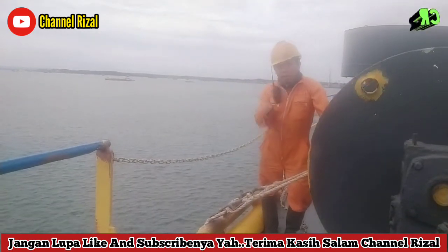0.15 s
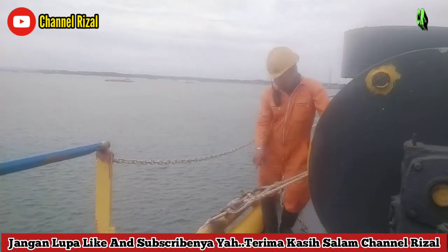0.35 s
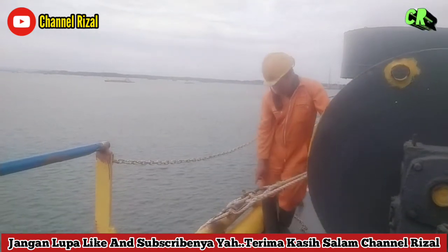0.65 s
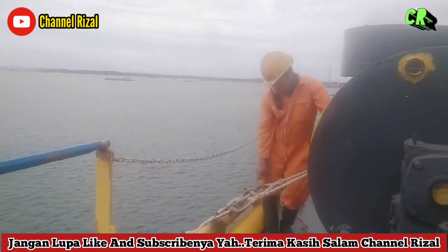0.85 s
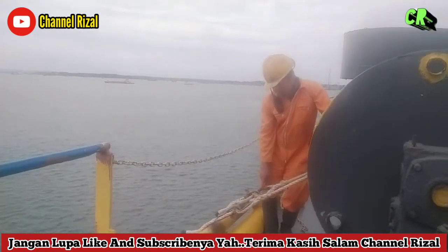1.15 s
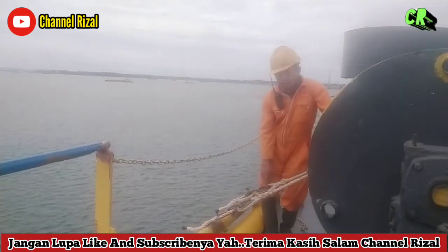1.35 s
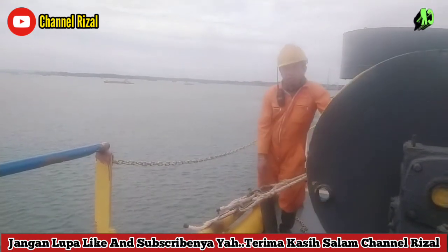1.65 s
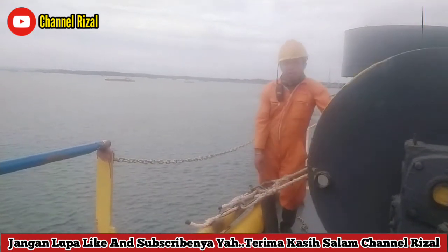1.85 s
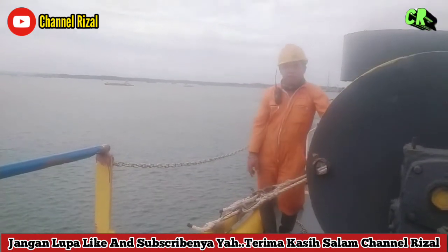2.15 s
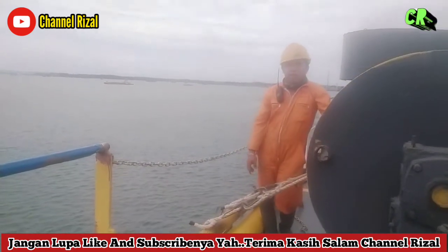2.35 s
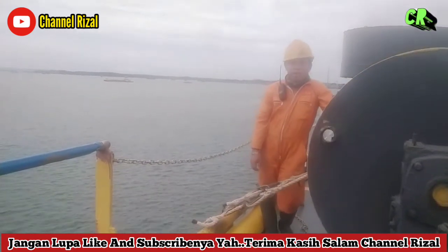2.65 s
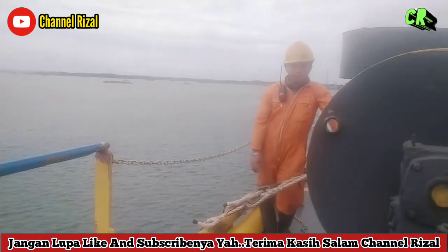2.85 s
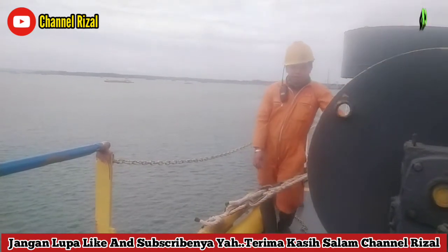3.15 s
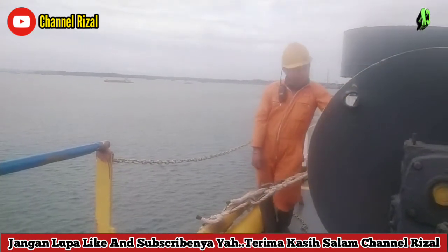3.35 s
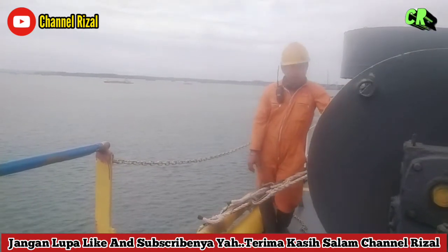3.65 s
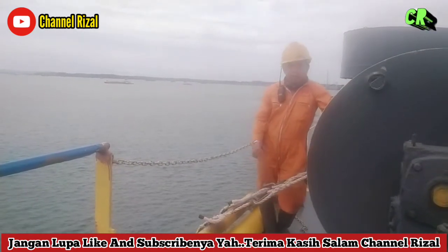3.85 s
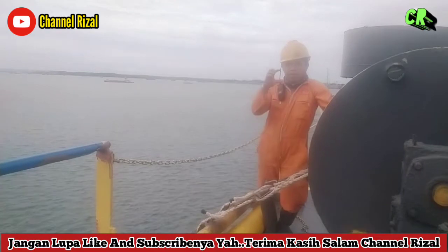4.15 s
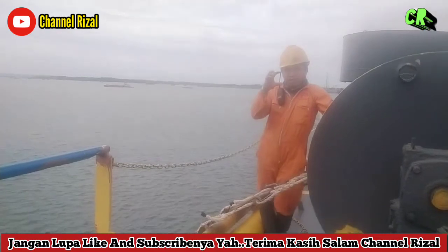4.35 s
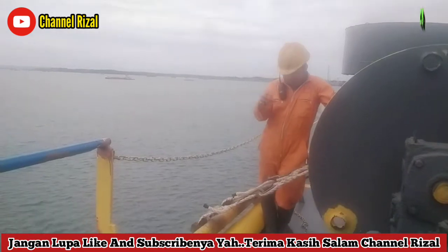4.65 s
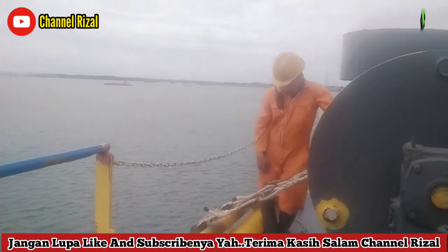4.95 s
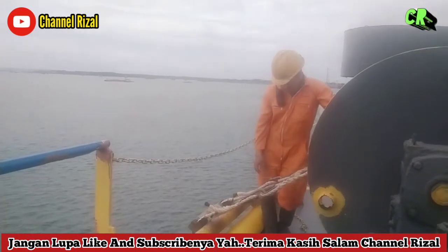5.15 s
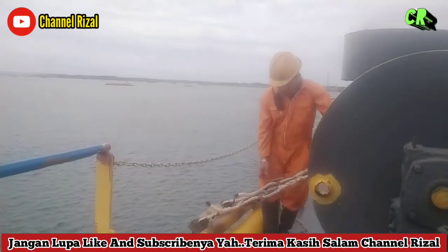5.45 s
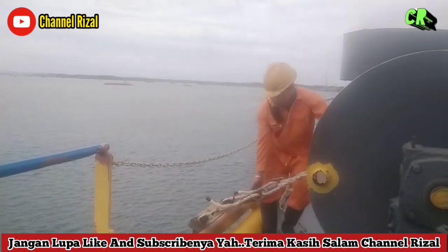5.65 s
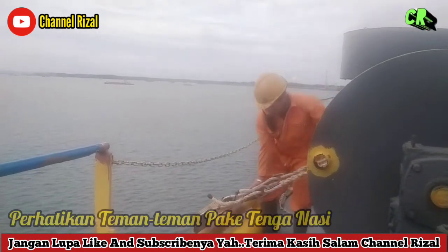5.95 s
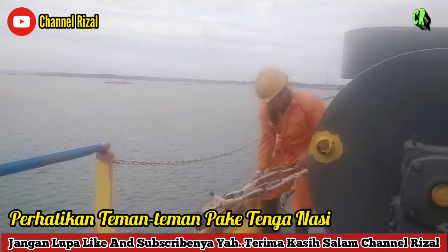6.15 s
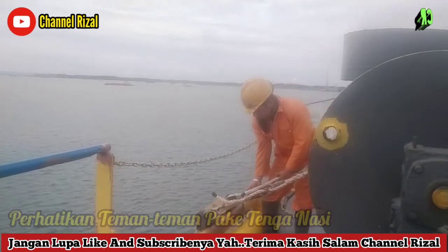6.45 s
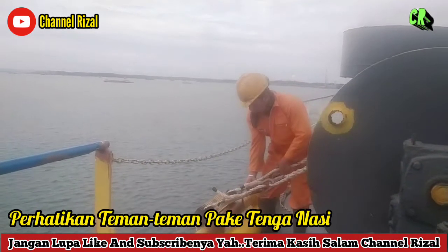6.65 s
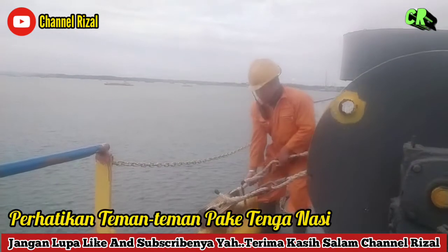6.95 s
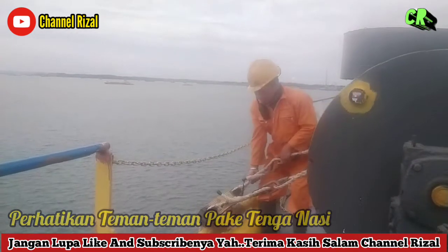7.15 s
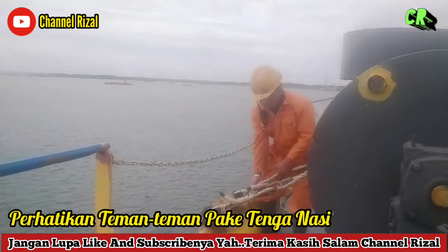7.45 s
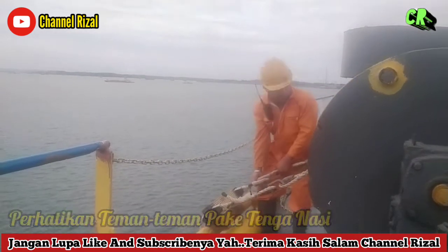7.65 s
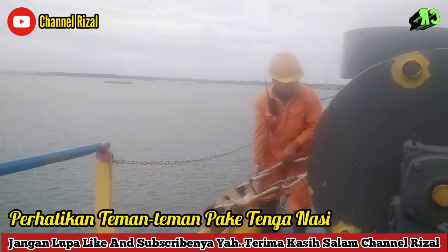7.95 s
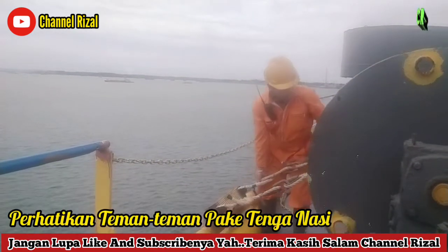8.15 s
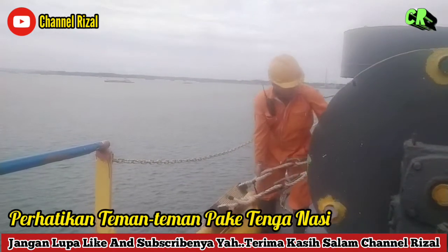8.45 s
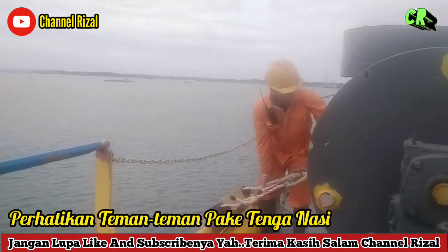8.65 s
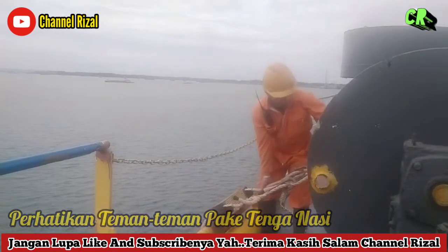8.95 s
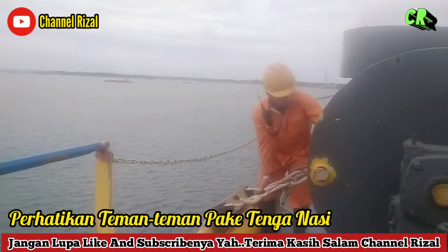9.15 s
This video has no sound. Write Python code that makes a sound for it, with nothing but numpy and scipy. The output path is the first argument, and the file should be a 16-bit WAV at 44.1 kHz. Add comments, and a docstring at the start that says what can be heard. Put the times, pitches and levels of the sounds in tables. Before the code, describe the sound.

A vane air motor turns a big reel beside the microphone. Its rough, reedy whine flutters slightly and changes colour as its pitch slides, covered by a dense, jet-like hiss of escaping air. After a steady start it labours and droops, recovers, droops deeper, then speeds up with small surges before easing. Quiet ship machinery hum underneath; close, centred, harsh sound with momentary small drops in loudness.

```python
"""On a ship's deck, close by, a vane air motor winds a heavy ladder onto its reel.
Each vane lets out a puff: the puffs make a whine whose harmonics swell and fade as they slide
through the housing's resonances. The motor sags under load, then runs free again.
Exhaust air hisses loudly as shaped noise, the gears sing as tones locked to the rotor,
and the ship rumbles below as low noise and two wavering hums."""
import sys
import numpy as np
from scipy import signal
from scipy.fft import rfft, irfft, next_fast_len
from scipy.io import wavfile

SR = 44100
rng = np.random.default_rng(int(sys.argv[2]) if len(sys.argv) > 2 else 0)


def wav_out(sig):
    """Save sig, one row per channel (or a flat mono array), as 16-bit PCM at SR to the path in sys.argv[1]."""
    wavfile.write(sys.argv[1], SR, np.round(np.clip(np.atleast_2d(sig).T, -1, 1) * 32767).astype(np.int16))


N = 410130

FREE_SPEED_HZ = 305  # vane puffs per second; reference for unevenness and hiss brightness


def from_db(db):
    """Level law: decibels to amplitude gain, 20 dB per factor of ten."""
    return 10 ** (np.asarray(db) / 20)


def rms_one(x):
    """Power normalisation: scale to rms 1."""
    return x / np.sqrt(np.mean(x ** 2) + 1e-20)


def in_time(rows):
    """Linear interpolation of (time, value) rows to every sample."""
    return np.interp(np.arange(N) / SR, *np.transpose(rows))


def response(modes, hz):
    """Power sum of steep-sided resonances; each width is taken at half the peak amplitude."""
    power = 0
    for centre, width, db in modes:
        detuning = 2 * (hz - centre) / width
        power = power + from_db(db) ** 2 / (1 + detuning ** 2) ** 2
    return np.sqrt(power)


def cancelling(hz):
    """Destructive interference: the gain falls to zero and changes sign at each notch."""
    # where the paths round the housing cancel: centre_hz, width_hz
    notches = [(908, 26), (1492, 45), (1606, 51), (2032, 25), (2406, 16), (3825, 180)]
    factors = [(hz - centre) / np.hypot(hz - centre, width / 2) for centre, width in notches]
    return np.prod(factors, axis=0)


def causal(gain):
    """Minimum phase: the Hilbert transform of log gain gives the phase of a causal resonator."""
    mirrored = np.log(np.abs(np.r_[gain, gain[-2:0:-1]]) + 1e-3)
    return np.exp(np.conj(signal.hilbert(mirrored)))[:len(gain)]


def noise(gain_at):
    """Spectral shaping: white noise weighted by a function of frequency, scaled to rms 1."""
    size = next_fast_len(N, real=True)
    white = rfft(rng.standard_normal(size))
    hz = np.arange(len(white)) * SR / size + 1e-3  # offset keeps log(hz) finite
    return rms_one(irfft(white * gain_at(hz), size)[:N])


def drift(rate_hz):
    """Low-pass random process: noise through two equal poles at rate_hz, scaled to rms 1."""
    step = 40  # samples between the slow values
    pole = np.exp(-2 * np.pi * rate_hz * step / SR)
    steps = rng.standard_normal(N // step + 2002)
    slow = signal.lfilter([1], [1, -2 * pole, pole * pole], steps)[2000:]  # drop the settling
    return np.interp(np.arange(N) / step, np.arange(len(slow)), rms_one(slow))


def motor_speed():
    """Load balance: drags pull the speed down exponentially until the ladder frees; surges lift it."""
    # speed at which the air supply drives the motor, before drags and surges: time_s, puffs_hz
    supply_speed = [(0.0, 305.1), (1.63, 304.0), (2.04, 301.1), (2.41, 308.4), (3.42, 302.5), (5.45, 306.2),
                    (6.59, 311.5), (6.78, 325.0), (7.12, 327.5), (7.48, 316.3), (8.14, 315.3), (9.3, 302.6)]
    # the ladder drags; the drop is what an endless drag would reach: start_s, end_s, drop_hz, recovery_s
    drags = [(3.425, 4.08, 45, .263), (4.3, 5.46, 68, .116)]
    # the load eases; half_length_s is from the peak to 1/e: peak_s, rise_hz, half_length_s
    surges = [(6.2, 10, .124), (7.107, 6, .063), (7.93, 14, .1), (8.516, 9, .1)]
    sag_s = .94  # time constant of the sinking
    t = np.arange(N) / SR
    sag, surge = 0, 0
    for start, end, drop, recovery in drags:
        sinking = 1 - np.exp(-np.maximum(t - start, 0) / sag_s)
        sag = sag + drop * sinking * np.clip(1 - (t - end) / recovery, 0, 1)
    for peak, rise, half_length in surges:
        surge = surge + rise * np.exp(-((t - peak) / half_length) ** 2)
    return in_time(supply_speed) - sag + surge


def rotation(speed):
    """Frequency modulation: the load pulls on the rotor once per turn of a gear shaft."""
    puffs_per_shaft_turn = 22.6
    shaft = 2 * np.pi * np.cumsum(speed) / SR / puffs_per_shaft_turn
    slack = np.interp(speed, [FREE_SPEED_HZ, 330], [1, 1.8])  # more uneven when fast
    rate = speed * (1 + slack * (.004 * np.cos(shaft) + .0018 * drift(35)))
    return rate, 2 * np.pi * np.cumsum(rate) / SR


def whine(rate, phase, level_db=0.0, flutter_db=0.88):
    """Source and filter: each harmonic of the puffs takes the housing's response at its present pitch."""
    # resonances of the housing, driven by the puffs: centre_hz, width_hz, level_db
    housing_modes = [(308, 124, -26), (552, 116, -25), (809, 51, -27), (935, 89, -27.5), (1224, 233, -29),
                     (1335, 115, -18.5), (1445, 90, -10.5), (1522, 59, -19), (1705, 229, -24.5),
                     (1881, 323, -27), (2224, 220, -19), (2365, 74, -25), (2490, 188, -29),
                     (2830, 150, -25), (3028, 146, -23), (3542, 107, -26), (3653, 123, -23),
                     (4242, 341, -21)]
    # harmonics of one puff, before the housing acts: multiple of the vane rate, level_db
    puff_harmonics = [(1, 3), (2, 3), (3, 1), (4, 6), (5, 2.5), (6, 7), (7, 7), (8, 4), (9, 2), (10, 2),
                      (11, 5), (12, 2), (13, -1.5), (14, -2), (15, 4)]
    grid_hz = np.arange(SR // 4)
    housing = causal(response(housing_modes, grid_hz) * cancelling(grid_hz))
    out = 0
    for k, db in puff_harmonics:
        gain = np.interp(k * rate, grid_hz, housing) * from_db(db + flutter_db * drift(18))
        out = out + np.real(gain * np.exp(1j * k * phase))
    return from_db(level_db) * out


def gears(rate, phase, level_db=0.0, flutter_db=2.0):
    """Tooth meshing: tones locked to the rotor, loudest where the gear case resonates."""
    # gear tones, before the gear case acts: multiple of the vane rate, level_db
    gear_tones = [(.7235, -43), (1.447, -41), (2.2, -35), (4.4, -36), (6.6, -41), (8.8, -31)]
    # ring of the gear case, added in power to a gain of one: centre_hz, width_hz, level_db
    gear_case = [(191, 13, 8.5), (248, 6.7, 14), (437.5, 18, 7), (671, 51, 11)]
    out = 0
    for ratio, db in gear_tones:
        boost = np.hypot(1, response(gear_case, ratio * rate))
        level = from_db(db + level_db + flutter_db * drift(8.5))
        out = out + level * boost * np.sin(ratio * phase)
    return out


def puffs(phase, level_db=-18.5, depth=0.32, flutter_db=0.65):
    """Amplitude modulation of turbulence: air leaves in one burst per vane."""
    # resonances that colour the air of each puff: centre_hz, width_hz, relative level_db
    puff_modes = [(1385, 355, 1.5), (1660, 490, -0.5), (1880, 340, -6.5), (2264, 230, 2), (2410, 200, 2),
                  (2670, 200, 5.5), (2945, 400, 0), (3520, 1100, -6.5)]
    gate = rms_one(1 + np.clip(depth, 0, 1) * np.cos(phase))
    level = from_db(level_db + flutter_db * drift(9.5))
    return level * gate * noise(lambda hz: response(puff_modes, hz))


def exhaust(rate, phase, level_db=2.0, depth=0.042, flutter_db=0.38, treble_hz=7000.0, brightening=1.5):
    """Jet noise: turbulence filtered by the port's resonances, duller when the motor labours."""
    # slow course of the hiss level, before the overall level and flutter: time_s, level_db
    hiss_level = [(0.0, -13), (3.2, -13), (3.75, -14.5), (4.7, -13.5), (5.15, -12.5), (6.75, -12.5),
                  (7.2, -13.9), (8.4, -12.9), (9.3, -13.2)]
    # resonances of the exhaust port: centre_hz, width_hz, relative level_db
    port_modes = [(4216, 347, 0.5), (4615, 210, -7), (4960, 360, -10), (5520, 500, -11), (5886, 256, -6),
                  (6363, 117, -0.5), (6500, 330, -8.5), (6910, 300, -7), (7230, 315, -4),
                  (7790, 450, -11.5), (8527, 390, -6.5), (8730, 460, -6), (9110, 330, -7.5),
                  (9790, 420, -9.5), (10120, 310, -4), (10570, 250, -14), (11200, 740, -17.5),
                  (11620, 420, -11.5), (12640, 780, -12.5), (13350, 550, -12.5), (13960, 500, -10.5),
                  (14530, 660, -12), (15200, 800, -14)]
    hiss = noise(lambda hz: response(port_modes, hz) * cancelling(hz))
    treble = signal.sosfilt(signal.butter(1, treble_hz, "high", fs=SR, output="sos"), hiss)
    hiss = hiss + brightening * (rate / FREE_SPEED_HZ - 1) * treble
    level = from_db(in_time(hiss_level) + level_db + flutter_db * drift(14))
    return level * (1 + depth * np.cos(phase)) * hiss


def ship(rumble_db=-27.0, waver_db=4.0):
    """Broadband and tonal sources add: rumble plus machinery hum that wavers in level and phase."""
    # rumble of ship and deck, joined on a log frequency scale: frequency_hz, relative level_db
    deck_spectrum = [(15, -19), (36, -11), (48, -9.5), (62, -6), (77, -0.5), (95, -10.5), (120, -4),
                     (150, -13), (340, -3), (400, -7.5), (700, -7.5), (860, -11.5), (1150, -14),
                     (16000, -26)]
    # hum of the ship's machinery, about which it wavers: frequency_hz, level_db
    machinery_hum = [(75.4, -48.5), (118.4, -42.5)]
    points_hz, points_db = np.transpose(deck_spectrum)
    rumble = noise(lambda hz: from_db(np.interp(np.log(hz), np.log(points_hz), points_db)))
    turn = 2 * np.pi * np.arange(N) / SR
    hum = 0
    for hz, db in machinery_hum:
        hum = hum + from_db(db + waver_db * drift(5.7)) * np.sin(hz * turn + drift(2.1))
    return from_db(rumble_db) * rumble + hum


def dips(fall_s=0.0087, rise_s=0.013):
    """Gain envelope: the level drops quickly, holds and comes back, in ramps linear in decibels."""
    # brief dips, timed from mid-fall to mid-rise: start_s, length_s, depth_db
    brief_dips = [(0.135, 0.09, 3), (1.328, 0.083, 1.5), (1.684, 0.077, 1.3), (2.16, 0.12, 1.2),
                  (2.78, .09, 1.5), (3.4, 0.082, 2), (4.145, .09, 1.5), (4.627, 0.1, 2), (4.852, .1, 2),
                  (5.502, 0.11, 3), (6.974, .1, 1.5), (7.37, .12, 2.5), (7.752, 0.094, 1.5),
                  (8.68, 0.13, 2.5)]
    t = np.arange(N) / SR
    loss_db = 0
    for start, length, depth in brief_dips:
        ramps = np.minimum((t - start) / fall_s, (start + length - t) / rise_s)
        loss_db = loss_db + depth * np.clip(ramps + .5, 0, 1)
    return from_db(-loss_db)


def scene():
    """Superposition: one rotor drives whine, gears, puffs and hiss; both channels are the same."""
    rate, phase = rotation(motor_speed())
    motor = whine(rate, phase) + gears(rate, phase) + puffs(phase) + exhaust(rate, phase)
    return np.tile(dips() * (motor + ship()), (2, 1))


def record(dry):
    """Clipping and band limiting: the highest peaks are flattened, then the top is cut."""
    cutoff_hz = 15480
    low_pass = signal.ellip(12, .1, 80, cutoff_hz, fs=SR, output="sos")
    return signal.sosfilt(low_pass, np.clip(dry, -.82, .82))


dry = scene()
out = record(dry)
wav_out(out)
```